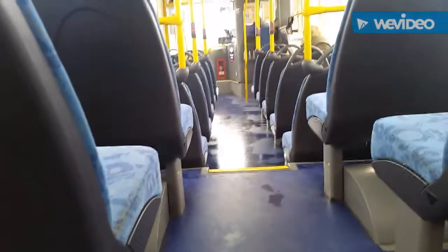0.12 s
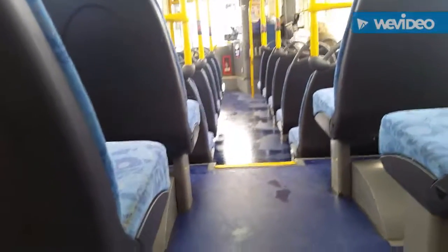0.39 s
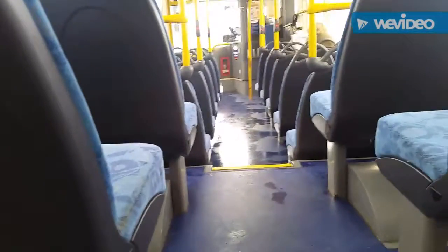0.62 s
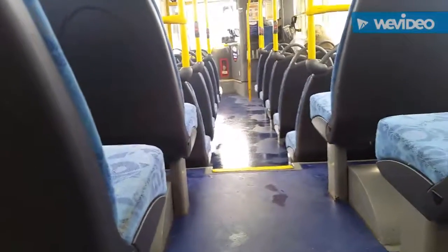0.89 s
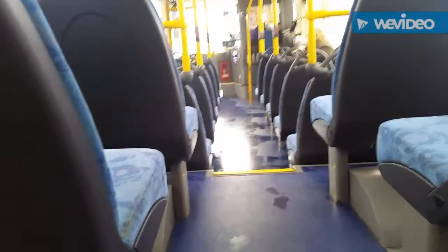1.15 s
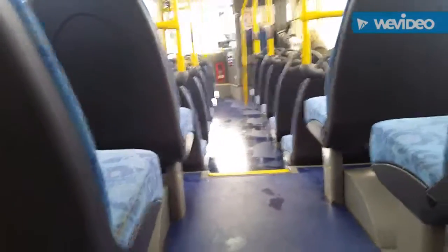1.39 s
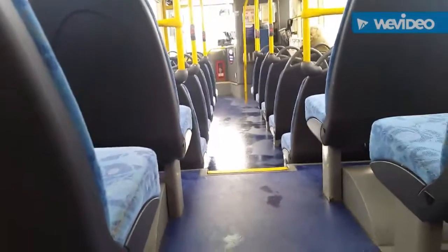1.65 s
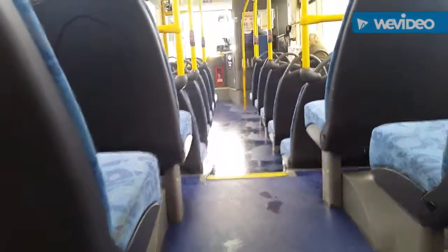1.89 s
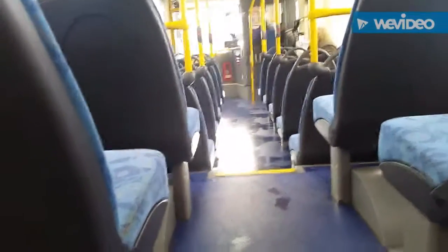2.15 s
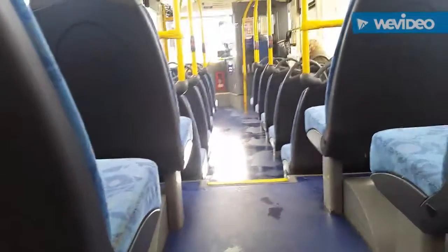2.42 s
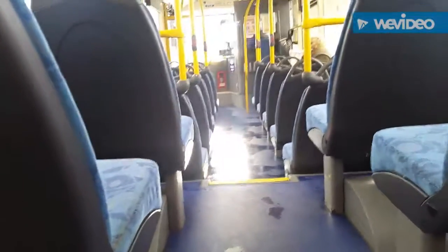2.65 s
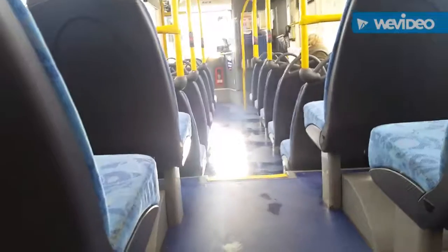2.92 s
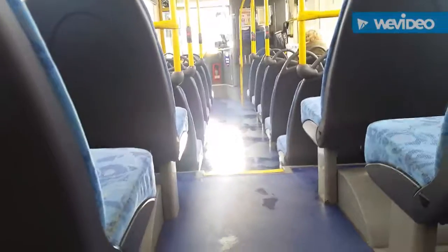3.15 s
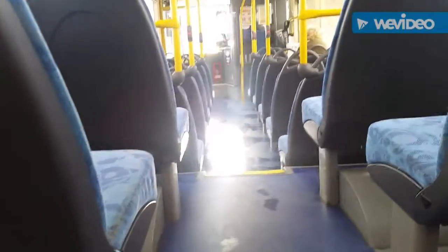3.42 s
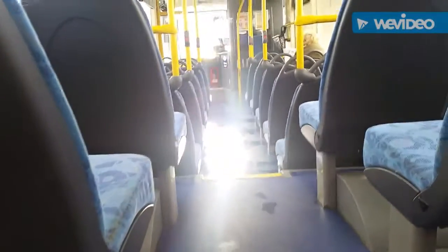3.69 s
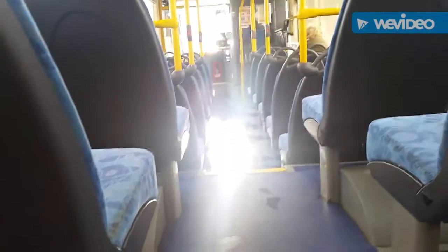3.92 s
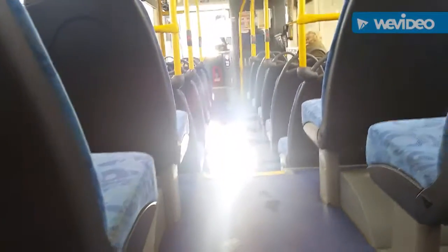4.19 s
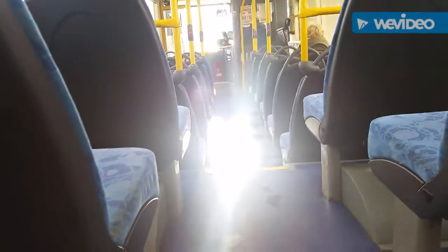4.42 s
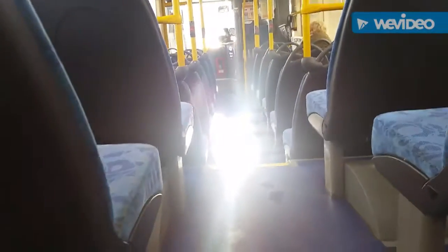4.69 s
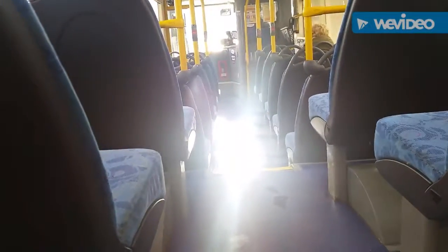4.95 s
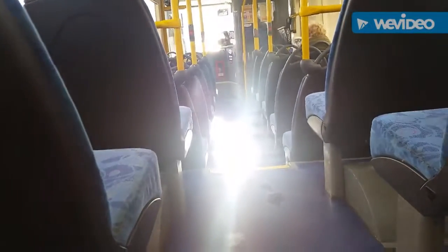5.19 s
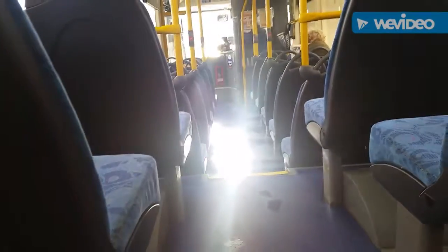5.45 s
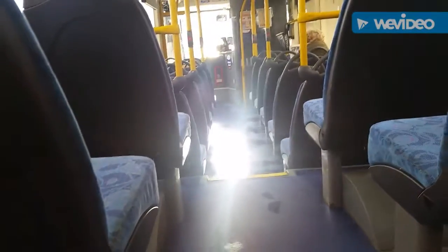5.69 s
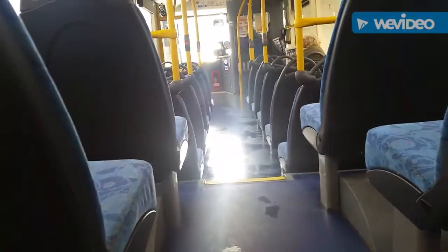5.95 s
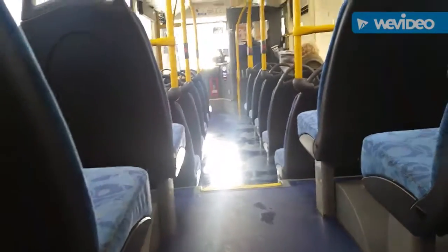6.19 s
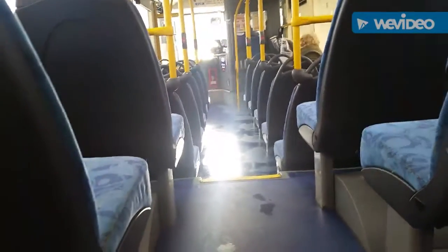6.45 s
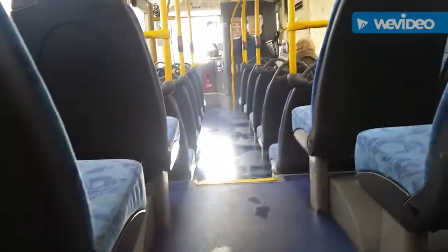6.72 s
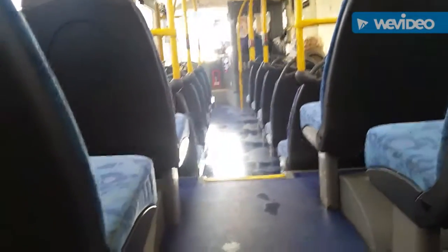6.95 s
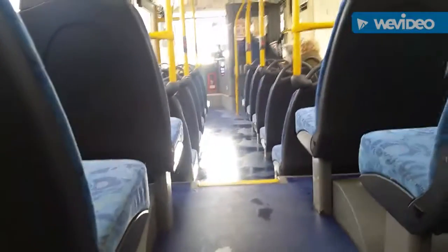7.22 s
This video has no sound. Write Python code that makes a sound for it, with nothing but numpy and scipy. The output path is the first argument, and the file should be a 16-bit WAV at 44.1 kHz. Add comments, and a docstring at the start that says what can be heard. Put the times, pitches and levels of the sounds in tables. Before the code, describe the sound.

From 0 to about 7.3 seconds, we are inside a diesel bus already moving, with one microphone near the cabin floor. A dense, low engine drone, muffled cylinder knock and thin gear whine blend into thick road rumble that booms and swells irregularly, strongest in the bass. Soft air hiss flutters above it. The engine runs at a middling speed and its tones slide down very slightly throughout. A loose fitting chatters faintly all along: a dry tick at 0.8 seconds, a quick scratchy cluster from 1.3 to 1.9 with a fuller cabin boom around 1.4, then isolated ticks near 2.5 and 3.4, clearer ones around 4.0 and 4.3, and small ones at 5.0 and 6.1. A heavy low shudder swells around 4.1. Bass peaks momentarily duck everything. The rumble continues to the end without stopping.

```python
"""Inside the cabin of a six-cylinder diesel bus, one microphone near the floor.
From the start, engine and gear tones locked to the engine speed sit in road rumble that booms in the cabin;
air hisses at the windows and a limiter ducks everything on bass peaks. A loose fitting chatters faintly;
it ticks at 0.8 s, clusters between 1.3 and 1.9 s, then ticks now and then until 6.1 s.
All the while the engine sinks very slightly, from about 1543 to 1475 rpm, and takes its tones down."""
import sys
import numpy as np
from scipy import signal
from scipy.fft import rfft, irfft
from scipy.io import wavfile
from scipy.ndimage import uniform_filter1d

SR = 44100
rng = np.random.default_rng(int(sys.argv[2]) if len(sys.argv) > 2 else 0)


def put_to_file(sound):
    """Save the sound as 16-bit audio at rate SR, in the file named by the first command-line argument."""
    columns = np.atleast_2d(sound).T  # one column per channel
    safe = np.clip(columns, -1, 1)
    whole_steps = np.round(safe * 32767)
    wavfile.write(sys.argv[1], SR, whole_steps.astype(np.int16))


def boost_factor(decibels):
    """Convert a level in decibels to a linear amplitude factor."""
    exponent = np.asarray(decibels, float) / 20
    return 10 ** exponent


N = 323694


def rms_one(x):
    """Scales to rms 1."""
    return x / np.sqrt(np.mean(x ** 2) + 1e-20)


def in_time(rows):
    """Columns of a curve table, one value a sample."""
    s, *columns = np.transpose(rows)
    return [np.interp(np.arange(N) / SR, s, c) for c in columns]


def drift(corner_hz):
    """Slow random wander of rms 1: noise through two equal one-pole low-passes."""
    hop = 100  # samples between computed points
    r = np.exp(-2 * np.pi * corner_hz * hop / SR)
    noise = rng.standard_normal(N // hop + 1002)
    slow = signal.lfilter([1], [1, -2 * r, r * r], noise)[1000:]  # without the filter's start
    return np.interp(np.arange(N) / hop, np.arange(len(slow)), rms_one(slow))


def coloured(x, spectrum):
    """Gives x the colour of a (f/Hz, density/dB) spectrum; rms 1."""
    hz, db = np.transpose(spectrum)
    bins_hz = np.arange(N // 2 + 1) * SR / N + 1
    gain_db = np.interp(np.log(bins_hz), np.log(hz), db, -120, -120)
    return rms_one(irfft(rfft(x) * boost_factor(gain_db), N))


def resonant_noise(modes):
    """Noise twice through each resonance, so the valleys stay dark."""
    out = np.zeros(N)
    for hz, width, db in modes:
        r = np.exp(-np.pi * width / SR)
        section = [1, 0, -1, 1, -2 * r * np.cos(2 * np.pi * hz / SR), r * r]
        noise = rng.standard_normal(N + SR // 2)
        ringing = signal.sosfilt([section, section], noise)[SR // 2:]
        out += boost_factor(db) * rms_one(ringing)
    return out


def steadied(x, share, window_s):
    """Rms 1, with a share of its own slow level swing taken out."""
    power = uniform_filter1d(x ** 2, int(window_s * SR)) + 1e-9
    return rms_one(x / power ** (share / 2))


def dying(clicks, t60):
    """Turns each click into an envelope that dies away by 60 dB in t60 seconds."""
    return signal.lfilter([1], [1, -boost_factor(-60 / (t60 * SR))], clicks)


def strokes(cycles, count):
    """Samples where the shaft passes each of count marks a cycle, and the mark passed."""
    mark = np.floor(count * cycles).astype(int)
    at = np.flatnonzero(np.diff(mark)) + 1
    return at, mark[at] % count


def road():
    """Tyre and body noise in the cabin resonances, broad roar, and air hiss that flutters."""
    # slow levels before the random swells:
    # (t/s, body shake rms/dB, cabin boom rms/dB, floor drone rms/dB, swing of roar and hiss/dB)
    road_levels = [(0, -18, -21, -26, 0.7), (0.5, -19, -20.5, -25, -0.8), (1.0, -20.5, -20, -28.5, 0.2),
                   (1.4, -19, -13.5, -20.5, 1), (1.75, -18.5, -18.5, -25.7, -1.2),
                   (2.3, -19.5, -24, -26.5, 0.7), (2.65, -23.5, -18, -29, 0),
                   (3.2, -19.5, -27.5, -27.5, 1.4), (3.65, -26, -16, -32.5, -0.6),
                   (4.1, -12.5, -27, -27.5, 0.5), (4.45, -20.5, -22.5, -30, 0.5),
                   (5.1, -20, -16.5, -29, -0.6), (5.9, -17.5, -25, -29, 0.5), (6.3, -23, -15, -22.5, 0.5),
                   (6.85, -24, -18, -32, -0.3), (7.34, -26, -17, -26, 0.0)]
    # cabin and floor resonances, level within each group: (f/Hz, width/Hz, level/dB)
    shake_modes = [(25.9, 8.5, -1), (44.4, 16, 1)]
    boom_modes = [(54.8, 14.2, -5.5), (73.97, 10.7, -0.5), (91, 39, -11)]
    drone_modes = [(160, 60, 0.85), (202.2, 21.6, -1.85)]
    # higher resonances under road drive: (f/Hz, width/Hz, rms level/dB)
    panel_modes = [(294.4, 34, -28.6), (337.5, 33, -35), (473, 60, -41.5), (586.6, 60, -44.5),
                   (764, 53, -49.5), (1181, 71, -52.5), (1828, 120, -58.5), (2266, 26, -65.5),
                   (2360, 49, -66), (2820, 70, -61), (3290, 37, -74), (3590, 40, -70), (3810, 30, -73),
                   (3980, 60, -73)]
    # faint whistle in the draught, before it comes and goes: (f/Hz, width/Hz, rms level/dB)
    whistle_modes = [(15030, 90, -72)]
    # colours of roar and air hiss: (f/Hz, relative density per Hz/dB)
    roar_colour = [(8.2, -24), (14, -10.5), (64, 1.5), (88, -7.5), (123, -12), (181, -10.5), (242, -11.5),
                   (301, -15.5), (402, -14.5), (592, -18.5), (1010, -29.5), (1190, -29), (1590, -36),
                   (2840, -38), (4500, -62.5), (5850, -90), (9900, -120)]
    hiss_colour = [(1760, -23), (3000, -18), (4200, -14.5), (5180, -14.5), (5800, -20), (6390, -14),
                   (7560, -16), (8340, -9.5), (9660, -5), (13100, -12), (15100, -11.5), (16000, -12)]

    swell_corner_hz, swell_db = 8, 2.5  # each low band swells and fades at random
    gust_corner_hz, flutter_db = 5.7, 0.86  # roar and hiss flutter together
    *lows, rush_db = in_time(road_levels)
    shake_db, boom_db, drone_db = [db + swell_db * drift(swell_corner_hz) for db in lows]
    gust_db = rush_db + flutter_db * drift(gust_corner_hz)

    out = boost_factor(shake_db) * steadied(resonant_noise(shake_modes), share=0.54, window_s=0.056)
    out += boost_factor(boom_db) * steadied(resonant_noise(boom_modes), share=0.34, window_s=0.13)
    out += boost_factor(drone_db) * steadied(resonant_noise(drone_modes), share=0.45, window_s=0.083)
    out += resonant_noise(panel_modes)
    out += boost_factor(4.0 * drift(2.5)) * resonant_noise(whistle_modes)
    out += boost_factor(-23.5 + gust_db) * coloured(rng.standard_normal(N), roar_colour)
    hiss_db = -49.8 + gust_db + 0.82 * drift(9.1)  # with a quicker flutter of its own
    return out + boost_factor(hiss_db) * coloured(rng.standard_normal(N), hiss_colour)


def ticks(chatter_per_s, chatter_db, chatter_t60, cabin_t60, cabin_db):
    """Each tick is a short scratchy contact that shakes every mode anew; fainter ones chatter at random."""
    # ticks of a loose fitting: (t/s, force level/dB, brightness/dB per octave, contact t60/s)
    tick_rows = [(0.835, -56, -3, .016), (1.3299, -61, 14, 0.039), (1.4336, -55, 8, .02),
                 (1.4551, -46.5, -4, 0.015), (1.488, -64, 2, .03), (1.5005, -65, 2, .05),
                 (1.5914, -57, 0, .016), (1.5993, -42.5, 4, .016), (1.6244, -62, 0, .016),
                 (1.6501, -61, 0, .03), (1.6851, -60.5, 0, .016), (1.7305, -55, -2, .016),
                 (1.7386, -43.5, -4, .016), (1.7853, -56, -3, .016), (1.8352, -53, -2, .016),
                 (1.8911, -52, -6, .016), (2.4753, -61.5, 0, .016), (3.3962, -58, 2, .016),
                 (4.0272, -45, -6, 0.017), (4.0771, -57, 0, .016), (4.0800, -62, 18, 0.043),
                 (4.2702, -46, -3, 0.017), (4.278, -59, 0, .016), (5.035, -57.5, 15, .03),
                 (6.1235, -54, 0, .016)]
    # modes the fitting rings with: (f/Hz, relative level/dB, t60/s)
    fitting_modes = [(5200, -18, .002), (7980, -11, .015), (8700, -6, .004), (9400, -6, .015),
                     (10100, 0, .004), (11000, -1, .004), (12200, -5, .003), (13500, -7, .003),
                     (14900, -8, .004)]

    chance = rng.standard_normal((len(tick_rows), len(fitting_modes)))
    chatter_hits = rng.random(N) < chatter_per_s / SR
    faint = chatter_hits * boost_factor(chatter_db + 4.2 * rng.standard_normal(N))
    faint = dying(faint + 1e-18, chatter_t60)
    after = np.arange(SR // 10) / SR
    cabin = boost_factor(-60 / (cabin_t60 * SR))
    out = np.zeros(N)
    for k, (hz, mode_db, t60) in enumerate(fitting_modes):
        contact = faint * boost_factor(mode_db)
        octaves = np.log2(max(hz, 8000) / 8400.0)
        for (s, db, tilt, contact_t60), luck in zip(tick_rows, chance[:, k]):
            strength_db = db + mode_db + tilt * octaves + 2.0 * luck
            contact[int(s * SR):][:len(after)] += boost_factor(strength_db - 60 * after / contact_t60)
        # the contact itself, then its diffuse return from the cabin
        diffuse = boost_factor(cabin_db) * (1 - cabin) * dying(contact, cabin_t60)
        force = (contact + diffuse) * rng.standard_normal(N)
        r, w = boost_factor(-60 / (t60 * SR)), 2 * np.pi * hz / SR
        out += signal.lfilter([0, np.sin(w)], [1, -2 * r * np.cos(w), r * r], force)
    return signal.sosfilt(signal.butter(2, 4200, "high", fs=SR, output="sos"), out)


def knock(cycles, knock_db, clatter_db):
    """A pulse per firing, uneven by cylinder, clatter gated by it, and valve contacts that repeat each cycle."""
    # each cylinder's knock in firing order, before a random spread: (relative level/dB)
    cylinder_levels = [-10, -6, -27, 7, -2, 4]

    def band(x, low_hz, high_hz):
        """Second-order band-pass."""
        return signal.sosfilt(signal.butter(2, [low_hz, high_hz], "band", fs=SR, output="sos"), x)

    at, cylinder = strokes(cycles, count=6)
    pulses, contacts = np.zeros(N), np.zeros(N)
    pulses[at] = boost_factor(np.array(cylinder_levels)[cylinder] + 2.0 * rng.standard_normal(len(at)))
    block = band(pulses, 380, 1300)
    clatter = band(dying(pulses, 0.092) * rng.standard_normal(N), 900, 3200)

    at, angle = strokes(cycles, count=600)
    contacts[at] = rng.standard_normal(600)[angle]  # one random pattern, the same every cycle
    valves = band(contacts, 650, 2500)
    valves = signal.lfilter([1], [1, -.9], valves)  # the cabin floor dulls them
    valves = boost_factor(-46) * rms_one(valves)
    return boost_factor(knock_db) * rms_one(block) + valves + boost_factor(clatter_db) * rms_one(clatter)


def standing_db(hz):
    """Standing waves at the seat lift or cancel a tone that passes through their pitch."""
    # standing waves: (f/Hz, width/Hz, lift/dB)
    standing_waves = [(203.5, 2.5, 13), (296.5, 5, 13), (335, 6, 11), (555, 7, 10), (780, 3, -13),
                      (895.5, 3, -14), (922, 6, -14), (1164, 3.7, -17), (1192, 6.5, -14)]
    return sum(db * np.exp(-.5 * ((hz - centre) / width) ** 2) for centre, width, db in standing_waves)


def tone(cycles, order, db, waver_db):
    """One order of the rotation; its level wavers slowly."""
    phase = 2 * np.pi * (order * cycles + rng.random())
    return np.sqrt(2) * boost_factor(db + waver_db * drift(1.0)) * np.sin(phase)


def drivetrain(cycles):
    """Engine orders and gear whine as clean lines on the shaft angle."""
    # engine tones, level before the waver: (multiple of the four-stroke cycle rate, rms level/dB)
    engine_orders = [(1, -41), (4, -34), (6, -33), (8, -45), (9, -47), (12, -37), (13, -37), (14, -41),
                     (15, -44), (17, -46), (18, -41), (21, -48), (22, -38), (23, -40), (27, -44), (29, -44),
                     (34, -54), (38, -41), (40, -52), (42, -53), (48, -46), (54, -58), (56, -59), (61, -56),
                     (68, -59), (96, -60), (106, -66), (144, -66)]
    # gear tones, level before the waver: (multiple of the gear rate, rms level/dB)
    gear_orders = [(6, -47), (10, -62), (14, -61), (15, -68), (22, -67), (24, -62), (26, -69), (34, -73),
                   (36, -69), (38, -74)]
    # engine tones with little waver: a steady order 2, the rest lifted or cancelled by standing waves;
    # level before lift and waver: (multiple of the four-stroke cycle rate, rms level/dB)
    calm_orders = [(2, -30), (16, -45), (24, -39), (26, -48), (44, -50), (72, -46)]
    # gear tones with little waver, lifted or cancelled by standing waves;
    # level before lift and waver: (multiple of the gear rate, rms level/dB)
    calm_gear_orders = [(3, -46), (8, -43), (12, -43.5)]

    gear = 7.8 * cycles  # gear turns per four-stroke cycle
    out = sum(tone(cycles, order, db, waver_db=2.5) for order, db in engine_orders)
    out += sum(tone(gear, order, db, waver_db=3.5) for order, db in gear_orders)
    for shaft, orders in ((cycles, calm_orders), (gear, calm_gear_orders)):
        shaft_hz = np.gradient(shaft) * SR
        for order, db in orders:
            lifted_db = db + standing_db(order * shaft_hz)
            out += tone(shaft, order, lifted_db, waver_db=1.2)
    return out


def scene():
    """All sources at one microphone near the floor."""
    # engine speed: (t/s, speed/rpm)
    engine_speed = [(0.0, 1542.9), (0.6, 1537.8), (1.2, 1527.3), (1.8, 1527.7), (2.4, 1519.2),
                    (3.0, 1515.8), (3.6, 1507.1), (4.2, 1504.1), (4.8, 1496.6), (5.4, 1493.7),
                    (6.0, 1489.6), (6.6, 1484.2), (7.34, 1475.3)]
    rpm = in_time(engine_speed)[0]
    cycles = np.cumsum(rpm / 120 / SR)  # a four-stroke cycle takes two turns
    engine = drivetrain(cycles) + knock(cycles, knock_db=-61.5, clatter_db=-55)
    fitting = ticks(chatter_per_s=25, chatter_db=-67, chatter_t60=0.015, cabin_t60=0.15, cabin_db=6.0)
    return (road() + fitting + engine)[None]


def band_limit(x):
    """A steep low-pass at the top of the band."""
    return signal.sosfilt(signal.butter(12, 16710, fs=SR, output="sos"), x)


def record(dry):
    """A fast limiter pulls the gain down on bass peaks and lets go within tens of ms; the top is cut."""
    threshold_db, ratio = -8.27, 0.6  # ratio: share of the excess taken off
    over_db = np.maximum(20 * np.log10(np.abs(dry[0]) + 1e-9) - threshold_db, 0)
    slope = 294.0 * np.arange(N) / SR  # release of the held excess, dB per second
    held_db = np.maximum.accumulate(over_db + slope) - slope
    r = np.exp(-1 / (0.0015 * SR))  # 1.5 ms smoothing
    early_db = np.roll(held_db, -60)  # looks 60 samples ahead
    duck_db = signal.lfilter([1 - r], [1, -r], early_db)
    ducked = dry * boost_factor(-ratio * duck_db)
    top_cut = signal.ellip(10, .2, 40, 15730, fs=SR, output="sos")  # corner in Hz
    return band_limit(signal.sosfiltfilt(top_cut, ducked))


dry = scene()
out = record(dry)
put_to_file(out)
```